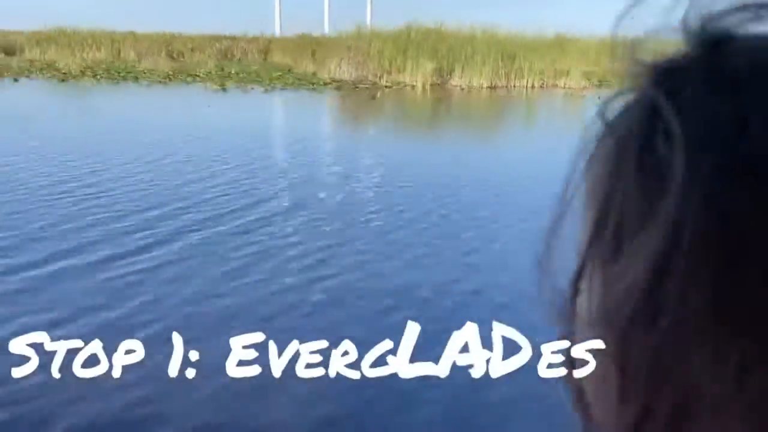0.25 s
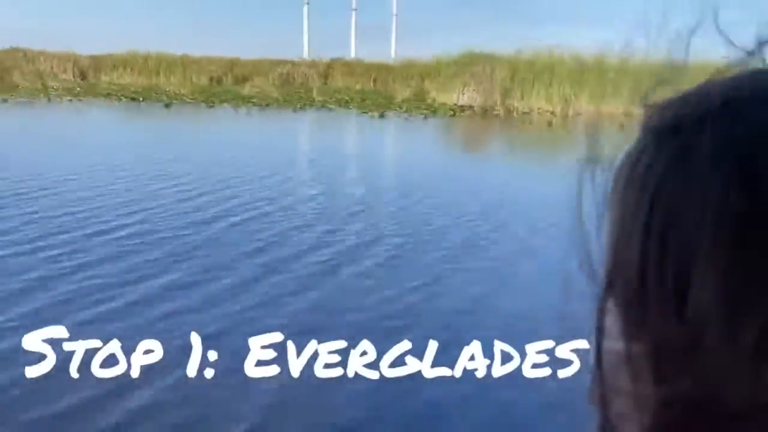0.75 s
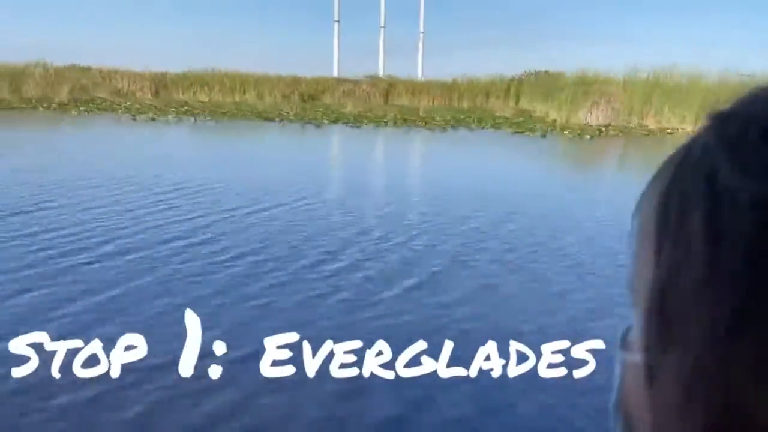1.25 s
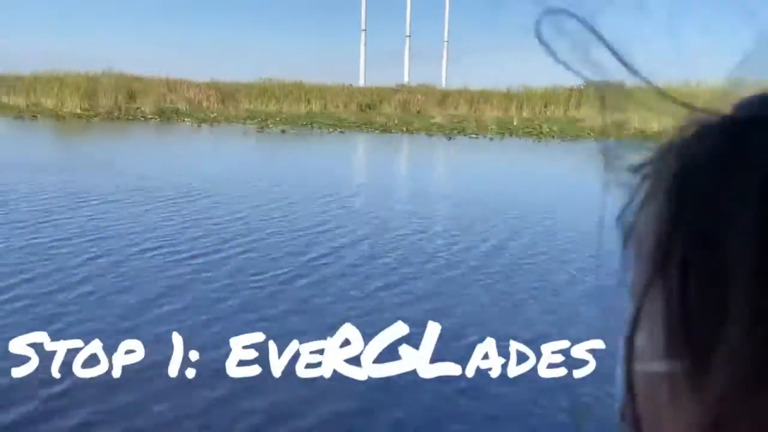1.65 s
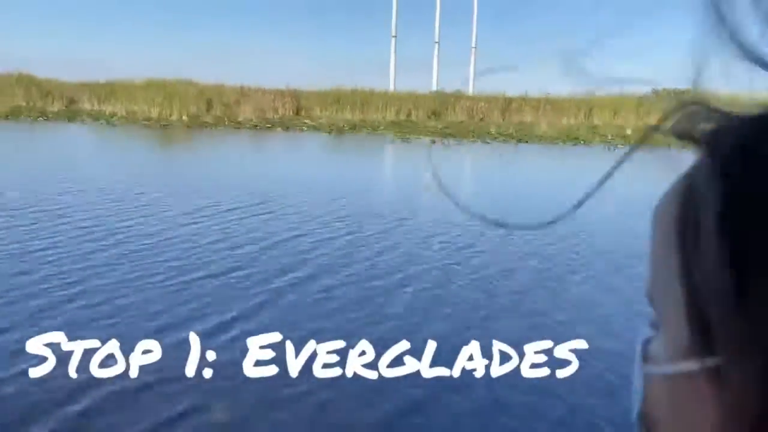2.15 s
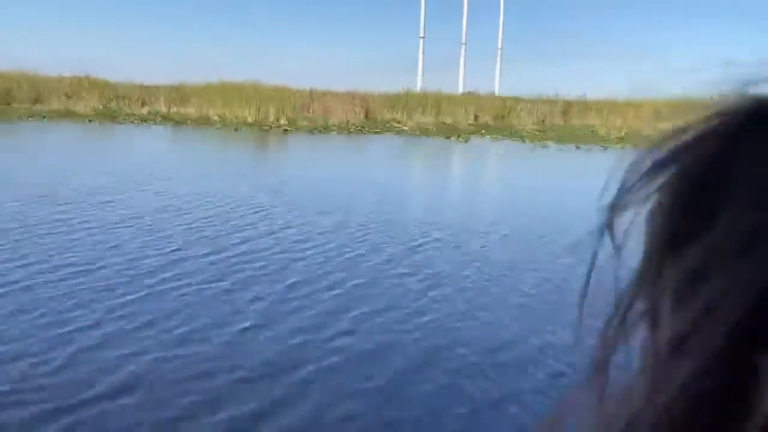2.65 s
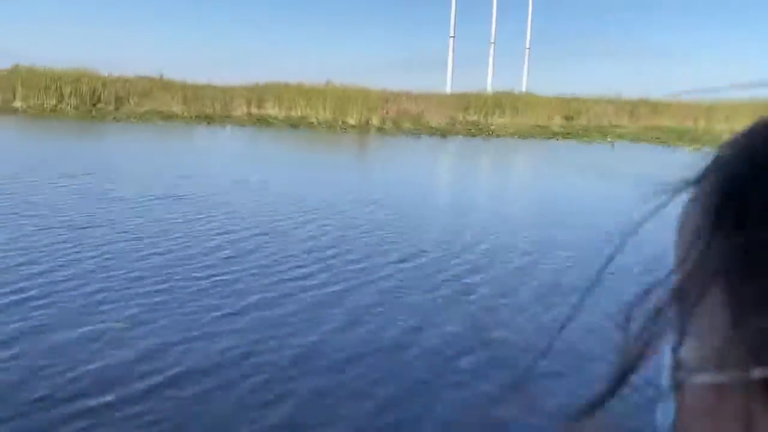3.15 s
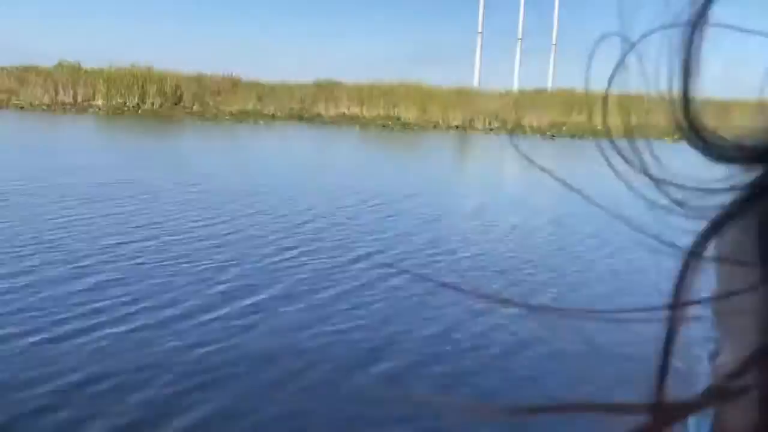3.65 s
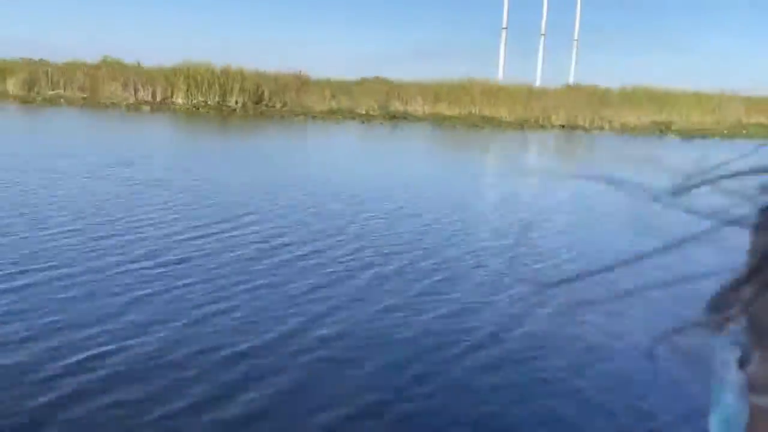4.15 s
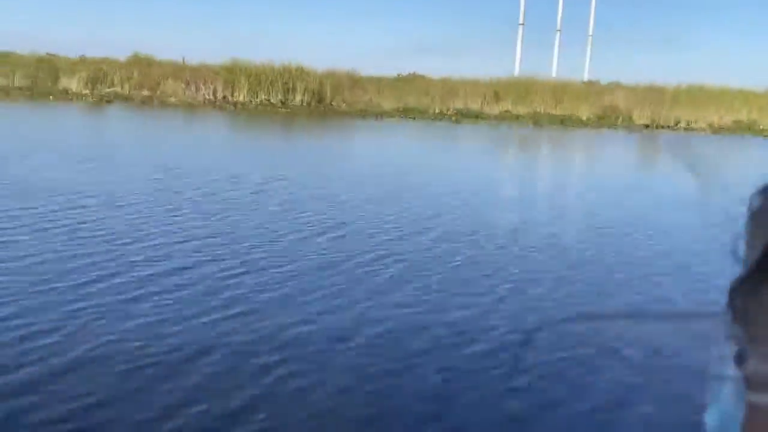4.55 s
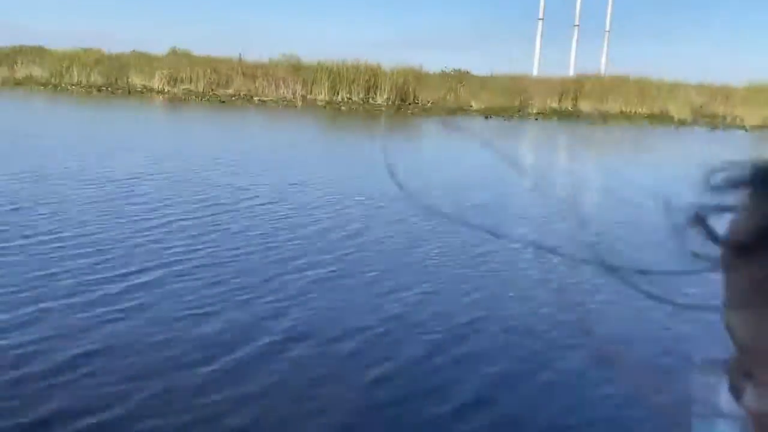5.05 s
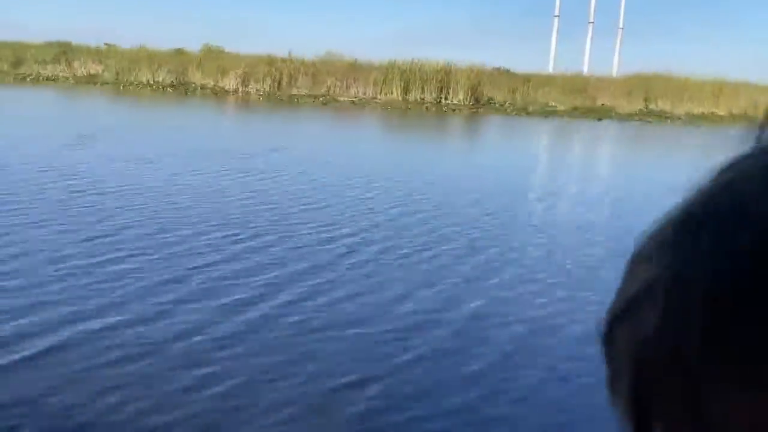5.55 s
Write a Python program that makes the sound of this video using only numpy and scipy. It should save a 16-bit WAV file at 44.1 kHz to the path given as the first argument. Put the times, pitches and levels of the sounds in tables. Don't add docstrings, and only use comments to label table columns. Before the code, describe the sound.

On an airboat speeding over open water, two fan engines roar close by. One holds a deep, buzzing blade drone; around one second the other revs up slightly, then falls back by three seconds. The tones beat and throb together under exhaust, wind and spray, easing a little. Handheld phone near the fans, loud and slightly saturated stereo; abruptly duller and quieter at the very end.

```python
import sys
import numpy as np
from scipy import signal
from scipy.fft import rfft, irfft, next_fast_len
from scipy.io import wavfile
from scipy.ndimage import uniform_filter1d

SR = 44100
rng = np.random.default_rng(int(sys.argv[2]) if len(sys.argv) > 2 else 0)


def natural_amplitude(level_db):
    exponent = np.asarray(level_db, float) / 20
    return 10 ** exponent


def master(y):
    cut = np.clip(np.atleast_2d(y).T, -1, 1)
    pcm = np.round(cut * 32767)
    wavfile.write(sys.argv[1], SR, pcm.astype(np.int16))


N = 256662

# (time [s], blade rate [Hz])
STEADY_PITCH = [(0.0, 95.54), (0.8, 95.86), (1.6, 96.04), (2.4, 95.87), (3.2, 95.66), (4.0, 95.57),
                (4.8, 95.66), (5.82, 95.39)]
# (time [s], blade rate [Hz])
REVVING_PITCH = [(0.0, 80.5), (0.4, 80.06), (0.8, 80.2), (1.0, 82.15), (1.2, 84.45), (1.4, 86.64),
                 (1.6, 88.18), (1.8, 87.72), (2.0, 86.04), (2.2, 85.1), (2.5, 83.38), (2.8, 81.78),
                 (3.1, 80.26), (3.5, 80.25), (4.0, 80.04), (4.6, 79.72), (5.2, 79.45), (5.82, 79.91)]
START_TURNS = [0.452, 0.118]
# (multiple of the blade rate [-], left level [dB], right level [dB], left leads by [rad])
STEADY_ORDERS = [(0.5, -40, -41, -0.2), (0.75, -38, -39, 0.0), (1.0, -14, -18, -0.1),
                 (1.25, -40, -42, -0.0), (1.5, -37, -47, -0.3), (2.0, -22, -22, -0.3), (2.5, -45, -45, 0.2),
                 (3.0, -29, -31, -0.9), (4.0, -30, -33, -0.6), (5.0, -31, -33, -0.4), (6.0, -34, -40, 2.1),
                 (6.5, -51, -42, 3.0), (7.0, -33, -33, 2.8), (7.5, -44, -39, -2.0), (8.0, -42, -27, -1.9),
                 (8.5, -48, -46, -0.9), (9.0, -45, -39, 1.7), (10.0, -41, -35, -1.1),
                 (11.0, -37, -39, -3.1), (12.0, -46, -44, -1.3), (13.0, -45, -66, 2.6),
                 (14.0, -48, -50, -1.6), (15.0, -48, -61, -1.4), (16.0, -56, -60, 3.0)]
REVVING_ORDERS = [(1.0, -18.5, -21, 0.1), (2.0, -23, -29.5, -1.0), (2.5, -43.5, -48, -0.3),
                  (3.0, -33, -49, -0.7), (4.0, -30, -30, 0.72), (5.0, -41.5, -35, -0.2),
                  (6.0, -42, -36, -0.45), (7.0, -39, -70, 6), (8.0, -37.5, -36.5, -2.5),
                  (9.0, -51, -39, -3), (10.0, -50, -41, 0.7), (11.0, -52.5, -44, -1), (12.0, -56, -57, 3.5),
                  (14.0, -57, -42, 5), (15.0, -45.5, -62, -4.5), (16.0, -52, -42, 2)]
# (frequency [Hz], left level [dB per Hz], right level [dB per Hz])
ROAR_SPECTRUM = [(30, -62, -62), (63.5, -54.5, -47), (139, -53.5, -49), (235, -58, -59), (340, -54, -53),
                 (497, -50, -55), (670, -54, -52), (900, -56, -57), (1206, -57.5, -59.5),
                 (1542, -62.5, -67), (2020, -71, -72), (3090, -77.5, -79), (3950, -82.5, -87.5),
                 (5430, -84.5, -92.5), (8700, -91.5, -85.5), (15400, -95, -99.5)]
# (frequency [Hz], likeness [0-1], left leads by [rad])
PORT_IMAGE = [(30, .96, 0), (130, .96, -.1), (220, .65, -.6), (350, .5, 0), (500, .6, -1), (700, .5, -3),
              (1000, .6, -2.6), (1600, .45, -3), (2600, .35, -4.5), (6000, .3, -7.5), (8700, .8, -9.4),
              (11000, .6, -11), (12500, .8, -12.5), (16000, .8, -12.6)]
# (time [s], load [dB])
LOAD = [
    (0.0, 0.93),
    (0.5, 0.56),
    (1.3, 0.9),
    (2.2, 0.52),
    (3.0, 0.058),
    (3.9, -0.41),
    (4.7, -0.46),
    (5.3, -0.42),
    (5.82, -0.73),
]
# (sum of both multiples [-], left level [dB], right level [dB], left leads by [rad])
CLASH_TONES = [(2, -50, -37.5, 1.2), (3, -41.5, -36.5, 2.3), (4, -39, -48, 1.4), (5, -38, -37, -0.3),
               (6, -35, -38, -1.5), (7, -39.5, -48, 2), (8, -41, -35.5, -2), (9, -41, -42.5, -0.8),
               (10, -47, -60.5, -2), (11, -56.5, -42.5, -1), (12, -45, -51, -4)]
# (load share [dB per dB], rev share [dB per Hz above cruise])
ROAR_RESPONSE = [(0.68, 0.04), (0.54, 0.1), (1.6, 0.13)]
STEADY_RESPONSE = {1: (0.26, -0.099), 2: (2.6, -0.064), 4: (1.7, -0.32), 5: (0.55, -0.25), 8: (4.9, 0.07),
                   10: (2.5, 0.15)}
REVVING_RESPONSE = {1: (0.31, 0.29), 2: (0.76, 0.91), 3: (1.2, -0.18), 4: (0.1, 0.27), 5: (0.3, 1.2),
                    9: (0.1, 0.3), 10: (-2.5, -0.8)}
# (order of the steady fan [-], middle [s], half length [s], change [dB])
HULL_SWELLS = [
    (5, 3.36, 1, 5),
    (4, 3.4, 0.94, 2.5),
    (2, 5.7, 0.55, -2.5),
    (5, 5.4, 0.7, -2.5),
]
# (frequency [Hz], half width [Hz], lift [dB])
HULL_PANELS = [(336, 8, 5), (432, 8, 5), (535, 18, 4), (606, 8, 3), (687, 8, 8), (798, 8, 8), (845, 8, 9),
               (940, 8, 8)]
# (from [Hz], to [Hz], deepest dip [dB])
DIPPING_BANDS = [(7300, 7800, 7), (7800, 8510, 9), (9520, 10400, 10), (10400, 11000, 5), (13200, 13900, 5),
                 (14500, 15200, 7), (15200, 16000, 14)]

HISS_FROM_HZ, SPRAY_FROM_HZ = 1380, 7500
CRUISE_HZ = 80
THIN = 12
CUT_S = 5.789


def curves(table):
    time_s, *columns = np.transpose(table)
    return [np.interp(np.arange(N) / SR, time_s, column) for column in columns]


def walk(rate, step):
    hold = int(SR / rate / 64)
    slow = np.repeat(rng.standard_normal(N // 64 // hold + 2), hold)
    slow = uniform_filter1d(uniform_filter1d(slow, hold), hold)
    return 2.08 * np.interp(np.arange(0, N, step) / 64, np.arange(len(slow)), slow)


def follow(per_load, per_hz):
    return per_load * curves(LOAD)[0] + per_hz * (curves(REVVING_PITCH)[0] - CRUISE_HZ)


def tone(phase, change_db, left_db, right_db, lead, wander_db, wander_rad):
    phase = phase[::THIN] + wander_rad * walk(3.013, step=THIN)
    size = np.sqrt(2) * natural_amplitude(change_db[::THIN] + wander_db * walk(3.94, step=THIN))
    return size * np.array([natural_amplitude(left_db) * np.cos(phase), natural_amplitude(right_db) * np.cos(phase - lead)])


def roar(angles, pulse=0.14, beat=0.14, swell_db=0.1, flicker_db=0.5):
    size = next_fast_len(N)
    hz = np.maximum(np.arange(size // 2 + 1) * SR / size, 1)

    def read(table, column):
        points = np.array(table)
        return np.interp(np.log(hz), np.log(points[:, 0]), points[:, column])

    like = np.clip(read(PORT_IMAGE, 1), 0, 1)
    shared, own = rfft(rng.standard_normal((2, size)))
    right = like * shared * np.exp(-1j * read(PORT_IMAGE, 2)) + np.sqrt(1 - like ** 2) * own
    colour = np.array([shared * natural_amplitude(read(ROAR_SPECTRUM, 1)), right * natural_amplitude(read(ROAR_SPECTRUM, 2))])
    colour = colour * np.sqrt(SR / 2)
    exhaust_db, slipstream_db, spray_db = (follow(*shares) for shares in ROAR_RESPONSE)
    throb = 1 + pulse * sum(np.cos(angle - 3.0) for angle in angles)
    together = 1 + beat * np.cos(angles[0] - angles[1] + 0.4)
    out, swell = 0, walk(0.53, step=1)
    for step in range(8, 29):
        centre_hz = 2 ** (step / 2)
        window = np.clip(1 - abs(2 * np.log2(hz) - step), 0, 1)
        band = irfft(colour * window, size)[:, :N]
        if centre_hz < HISS_FROM_HZ:
            layer_db = exhaust_db
            band = band * throb
        elif centre_hz < SPRAY_FROM_HZ:
            layer_db = slipstream_db
        else:
            layer_db = spray_db
        if 400 < centre_hz < 1100:
            band = band * together
        out = out + band * natural_amplitude(layer_db + swell_db * swell + flicker_db * walk(9, step=1))
    return out


def clash(steady_angle, revving_angle, smear=0.3, stagger=0.07, widest=8):
    load_db = follow(per_load=1.2, per_hz=0.26)
    steady_hz, revving_hz = curves(STEADY_PITCH)[0], curves(REVVING_PITCH)[0]
    scale_hz = np.arange(SR // THIN)
    ring_db = sum(db / (1 + ((scale_hz - hz) / width) ** 2) for hz, width, db in HULL_PANELS)
    out = 0
    for total, *ports in CLASH_TONES:
        total = round(total)
        for m in range(1, total):
            n = total - m
            if abs(n - m) > widest:
                continue
            db = load_db + np.interp(m * steady_hz + n * revving_hz, scale_hz, ring_db)
            db = db - 2.13 * abs(n - m) + 0.5 * (n - m) + 1 * (n == m)
            phase = m * steady_angle + n * revving_angle - smear * total ** 2 - stagger * (n - m) ** 2
            out = out + tone(phase, db, *ports, wander_db=1.0, wander_rad=0.18)
    return out


def fan(pitch, start, orders, response, swells, smear, spread, wander_db, wander_rad, load_share):
    angle = 2 * np.pi * (np.cumsum(curves(pitch)[0]) / SR + start)
    own_db = {k: follow(*shares) for k, shares in response.items()}
    for k, middle_s, half_s, db in swells:
        swell = np.exp(-((np.arange(N) / SR - middle_s) / half_s) ** 2)
        own_db[round(k)] = own_db[round(k)] + db * swell
    load_db = follow(load_share, 0)
    out = 0
    for k, *ports in orders:
        shake = min(abs(k - 1) / 4, 1.5) * (0.4 if k in own_db else 1)
        phase = k * angle - smear * k * (k - 1) - spread * (k - 1) * (k - 2)
        out = out + tone(phase, own_db.get(k, load_db), *ports, wander_db * shake, wander_rad * shake)
    return out, angle


def scene():
    steady, steady_angle = fan(STEADY_PITCH, START_TURNS[0], STEADY_ORDERS, STEADY_RESPONSE, HULL_SWELLS,
                               smear=0.44, spread=0.45, wander_db=1.3, wander_rad=0.25, load_share=0.5)
    revving, revving_angle = fan(REVVING_PITCH, START_TURNS[1], REVVING_ORDERS, REVVING_RESPONSE, [],
                                 smear=0.45, spread=0.2948, wander_db=1.8, wander_rad=0.4, load_share=0.57)
    tones = steady + revving + clash(steady_angle, revving_angle)
    tones = signal.resample_poly(tones, THIN, 1, axis=1)[:, :N]
    return tones + roar((steady_angle, revving_angle))


def flickering_bands(mid, rate=22, seldom=0.6):
    for low_hz, high_hz, deepest_db in DIPPING_BANDS:
        band_pass = signal.butter(4, (low_hz, high_hz), "band", fs=SR, output="sos")
        band = signal.sosfiltfilt(band_pass, mid)
        dip = np.clip(4 * (walk(rate, step=1) + 0.3 * walk(2, step=1) - seldom), 0, 1)
        mid = mid - (1 - natural_amplitude(-deepest_db * dip)) * band
    return mid


def dull_stretch(bright, join_s=0.0008):
    lows = signal.sosfilt(signal.butter(2, 350, fs=SR, output="sos"), bright)
    top = signal.sosfilt(signal.butter(2, 6000, "high", fs=SR, output="sos"), bright)
    dull = natural_amplitude(-3) * lows + natural_amplitude(-18) * bright + natural_amplitude(-4) * top
    share = np.clip((np.arange(N) / SR - CUT_S) / join_s, 0, 1)
    return (1 - share) * bright + share * dull


def low_pass(x):
    return signal.sosfilt(signal.butter(12, 15680, fs=SR, output="sos"), x)


def record(dry):
    bent = dry / (1 + dry ** 6) ** (1 / 6)
    left, right = dull_stretch(bent)
    null = signal.cheby2(3, 5, (8510, 9520), "stop", fs=SR, output="sos")
    mid = flickering_bands(signal.sosfiltfilt(null, left + right) / 2)
    narrow = signal.cheby2(8, 8, 12650, fs=SR, output="sos")
    side = signal.sosfiltfilt(narrow, left - right) / 2
    return low_pass(np.array([mid + side, mid - side]))


dry = scene()
out = record(dry)
master(out)
```